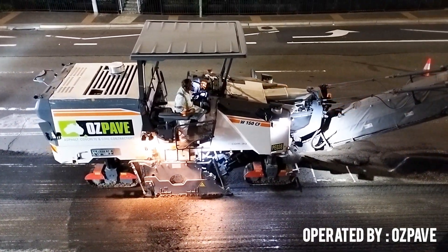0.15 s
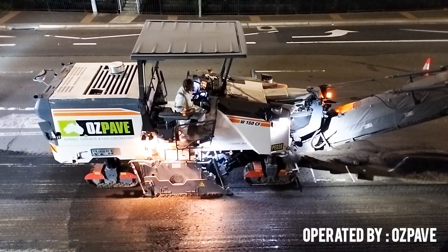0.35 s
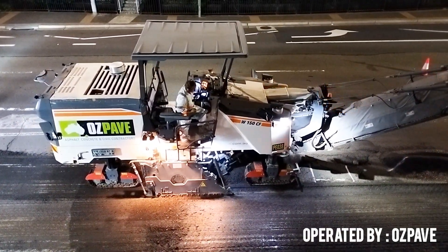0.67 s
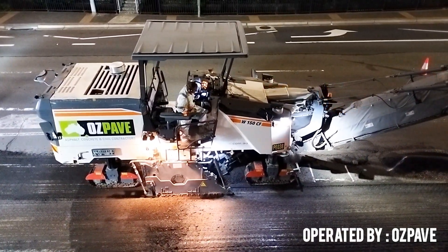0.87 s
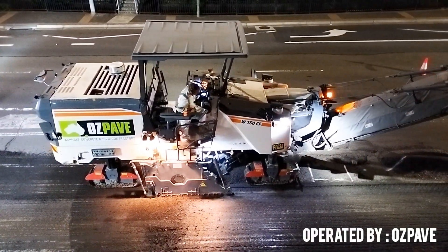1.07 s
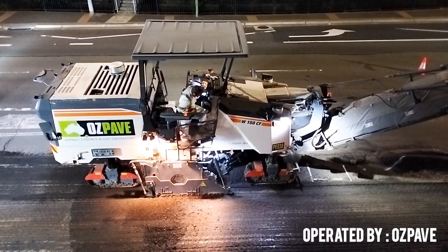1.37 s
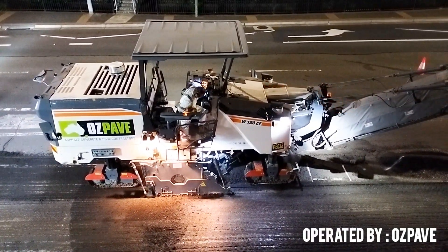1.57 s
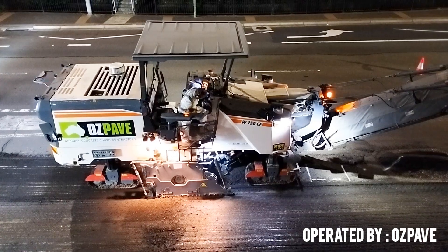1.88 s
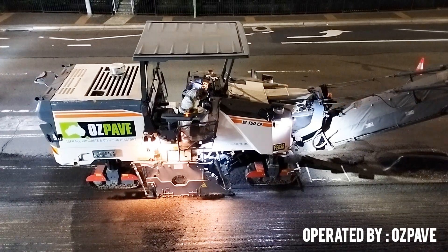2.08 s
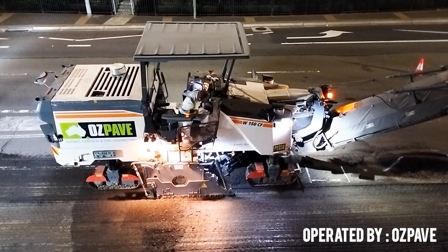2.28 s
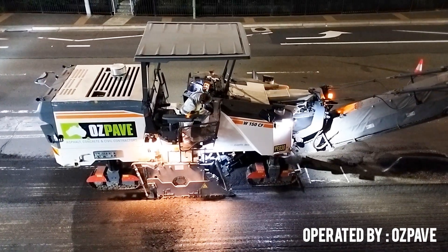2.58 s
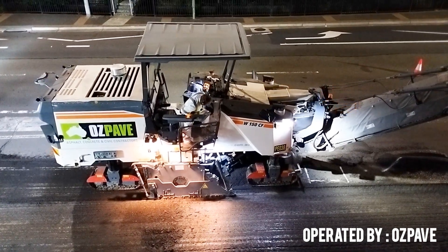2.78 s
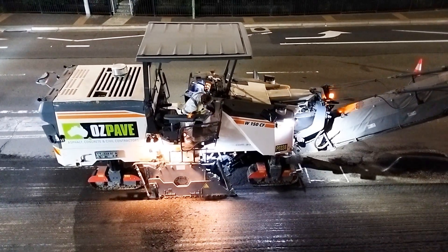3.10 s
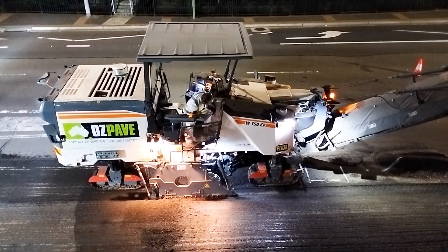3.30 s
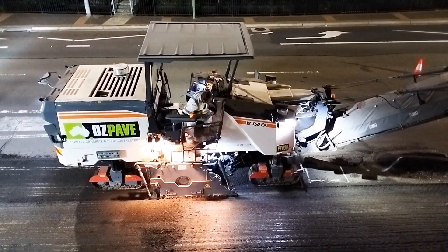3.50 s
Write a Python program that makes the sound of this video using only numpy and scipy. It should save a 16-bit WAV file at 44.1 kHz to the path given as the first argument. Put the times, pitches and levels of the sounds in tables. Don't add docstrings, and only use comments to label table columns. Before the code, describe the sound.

A road milling machine's diesel drones low, pulsing under load, with broadband drum roar and spray hiss; stones clatter on steel at once, then a few clacks. Outdoor night roadworks, heard from above on a phone.

```python
import sys
import numpy as np
from scipy import signal
from scipy.fft import rfft, irfft
from scipy.io import wavfile
from scipy.ndimage import uniform_filter1d

SR = 44100
rng = np.random.default_rng(int(sys.argv[2]) if len(sys.argv) > 2 else 0)


def magnitude_from_level(level_db):
    exponent = np.asarray(level_db, float) / 20
    return 10 ** exponent


def transcribe(signal):
    frames = np.atleast_2d(signal).T
    limited = np.clip(frames, -1, 1)
    pcm = np.round(limited * 32767).astype(np.int16)
    wavfile.write(sys.argv[1], SR, pcm)


N = 160965
T = np.arange(N) / SR
F = np.fft.rfftfreq(N, 1 / SR)

FIRING_HZ, DRUM_TURN_S = 103.05, 0.58
AIR_FROM_HZ = 7000

FIRING_ORDERS = (1 / 3, 1.5, 2, 2.5, 3, 4)
FIRING_ORDERS_DB = (-44, -29, -28, -27, -31, -33)
BELT_ORDERS = (1, 3, 7, 8, 9, 10, 13, 14, 16)
BELT_ORDERS_DB = (-49, -38, -30.5, -26, -33, -27.5, -47.5, -33, -38)
PUMP_ORDERS = (6, 7, 8)
PUMP_ORDERS_DB = (-55, -52, -45)
# frequency in Hz, density in dB per Hz.
ROAR_SPECTRUM = [(25, -44), (45, -25), (85, -10.5), (150, -9), (270, -4.5), (430, -8), (800, -17),
                 (1500, -22)]
# frequency in Hz, width in Hz, gain in dB.
HOUSING_MODES = [
    (150, 15, 4),
    (586, 210, -2.5),
    (810, 73, 3.5),
]
# frequency in Hz, density in dB per Hz.
SPRAY_SPECTRUM = [(1500, 1), (2300, -3.5), (2950, -5.5), (3500, -3.5), (4000, -4), (4400, -6.5),
                  (5500, -8.5), (7000, -12)]
# frequency in Hz, density in dB per Hz.
AIR_SPECTRUM = [(7000, 2.5), (7600, -6), (8100, -11.5), (9300, -19.5), (10000, -13), (11600, -6.5),
                (12800, -15.5), (14200, -21)]
# start
# in seconds, peak in dB, pitch in Hz, ring time in seconds.
STONES = [(.005, -12, 3430, 0.065), (.012, -3.5, 5140, 0.045), (.016, -2.5, 5130, .03),
          (.017, -15, 2130, .03), (0.022, -12, 3600, 0.041), (0.024, -4, 4330, 0.017),
          (0.03, -15, 2300, .04), (.048, -9, 1207, 0.17), (.056, -11, 1218, 0.23), (.066, -4, 4750, 0.02),
          (.067, -11, 3550, 0.029), (.070, -3, 2470, .018), (0.068, -9.5, 5660, 0.042),
          (0.07, -5, 1880, 0.015), (.073, -9.5, 3820, 0.032), (0.079, -12, 3480, .03),
          (0.084, -16, 5440, .04), (.106, -11.5, 1225, 0.21), (0.118, -9, 4960, 0.051),
          (.120, -6.5, 6430, .02), (.122, -15, 3390, 0.046), (0.141, -15, 2450, 0.051),
          (0.145, -15, 3320, 0.046), (0.225, -10, 4260, 0.014), (.226, -3, 1860, .022),
          (.228, -9, 2330, 0.021), (0.231, -13.5, 3420, 0.096), (.272, -13, 5030, 0.021),
          (.620, -13, 4300, 0.0089), (.623, -4, 2390, .015), (1.005, -20, 4000, 0.022),
          (1.013, -21, 3660, .02), (1.5635, 0, 2420, .007), (1.5636, -4, 3450, .007),
          (1.5668, -4, 2080, 0.01), (1.571, -17, 3980, 0.044), (1.580, -14, 2120, .03),
          (1.610, -11, 3400, 0.009), (1.614, -6, 3100, .01), (1.619, -16, 3600, .015),
          (1.624, -18, 2010, .02)]
# frequency in Hz, width in Hz, level in dB.
BED_MODES = [(1220, 40, 2), (2420, 60, -3), (3410, 60, -5), (3590, 50, -5), (3850, 60, -4), (5120, 87, -2),
             (5490, 60, -7), (6350, 77, -12)]
# start in seconds, peak in dB, pitch in Hz, ring time in seconds.
BOOMS = [
    (0.034, -1, 143, 0.22),
    (0.0067, -10, 100, 0.26),
    (0.1, -8, 85, 0.37),
]
# start in seconds, length in seconds, peak in dB, pitch in Hz, glide in Hz.
SQUEALS = [
    (1.19, .08, -24, 820, -80),
    (1.29, .07, -26, 820, 0),
    (1.46, .08, -37, 5750, 0),
    (1.95, .09, -34, 4680, 60),
    (3.17, .1, -36, 6700, 0),
]
# frequency in Hz, left over right in dB.
PORT_TILT = [(500, -.5), (1800, 2.5), (4500, -8), (8100, -1), (8900, 21), (9500, 15), (11000, -0.5),
             (14000, 7.5)]
# frequency in Hz, share of sound common to both from 0 to 1.
PORT_COHERENCE = [(200, 0.97), (400, 0.82), (750, 0.52), (1500, 0.23), (3500, 0.16), (5000, 0),
                  (7500, 0.28), (11500, 0.07)]


def level(x, db):
    return x * magnitude_from_level(db) / np.sqrt(np.mean(x ** 2))


def along(table):
    hz, value = np.array(table).T
    return np.interp(np.log(F + 1), np.log(hz), value)


def walk(rate):
    hold = int(SR / rate)
    steps = np.repeat(rng.standard_normal(N // hold + 1), hold)
    return 1.405 * uniform_filter1d(uniform_filter1d(steps, hold), hold)[:N]


def ring(push, hz, t60):
    pole = np.exp(2j * np.pi * hz / SR - np.log(1000) / (t60 * SR))
    return signal.lfilter([1], [1, -pole], push).imag


def right_delay():
    return np.exp(-2j * np.pi * F * 0.00054 * F / (F + 400))


def ports(rows):
    share = np.clip(along(PORT_COHERENCE), 0, 1)
    late = right_delay()
    common = rfft(rows[0]) * np.array([late ** 0, late])
    return np.sqrt(share) * common + np.sqrt(1 - share) * rfft(rows[1:])


def bands(spec, table, lo_hz, hi_hz, swell_db, near_db, flick_db):
    out, swell, near = 0, walk(5), walk(22)
    spec = spec * magnitude_from_level(along(table)) * (F > lo_hz) * (F < hi_hz)
    for hz in 22 * 2 ** np.arange(0, 9.6, 1 / 3):
        if lo_hz / 1.3 < hz < hi_hz * 1.3:
            near = 0.8 * near + 0.6 * walk(22)
            thirds = np.clip(3 * np.log2((F + 1) / hz), -1, 1)
            band = irfft(spec * np.cos(np.pi / 2 * thirds) ** 2, N)
            out = out + band * magnitude_from_level(swell_db * swell + near_db * near + flick_db * walk(20))
    return out


def lines(hz, orders, orders_db, wander, wobble_db, rate):
    out = 0
    for order, db in zip(orders, orders_db):
        size = np.sqrt(2) * magnitude_from_level(db + wobble_db * walk(2 * rate))
        turns = order * hz * T + rng.random() + wander * order * walk(rate)
        out = out + size * np.sin(2 * np.pi * turns)
    return out


def engines():
    labour = 1 + 0.26 * np.exp(2j * np.pi * (T - 1.99) / DRUM_TURN_S)
    load = magnitude_from_level(-13.5 - 14 * np.exp(-T / 0.32) + 0.5 * walk(20.26))
    firing = np.exp(2j * np.pi * FIRING_HZ * T + 0.15j * walk(4.7))
    main = np.sqrt(2) * load * (labour * firing).imag
    rough = lines(FIRING_HZ, FIRING_ORDERS, FIRING_ORDERS_DB, wander=0.09, wobble_db=4.0, rate=5)
    belt = lines(25.6, BELT_ORDERS, BELT_ORDERS_DB, wander=0.0064, wobble_db=2.75, rate=2.064)
    return main + rough + belt


def whines():
    rise = 0.32
    turn = ((T - 0.65) / DRUM_TURN_S) % 1
    sag = (1 - turn / (1 - rise)).clip(0) ** 1.6
    spool = np.maximum(sag, (turn - 1) / rise + 1)
    hz = 11550 + 550 * spool + 70 * walk(3) + 25 * walk(60)
    turbo = magnitude_from_level(-52 + 3.0 * walk(9) - 3.5 * spool) * np.sin(2 * np.pi * np.cumsum(hz) / SR)
    return turbo + lines(426.3, PUMP_ORDERS, PUMP_ORDERS_DB, wander=0.013, wobble_db=1.6, rate=1.6)


def roar():
    puff = 1 + 0.07 * np.sin(2 * np.pi * FIRING_HZ * T)
    noise = rng.standard_normal((3, N)) * puff
    housing = magnitude_from_level(sum(db * np.exp(-((F - hz) / width) ** 2) for hz, width, db in HOUSING_MODES))
    spec = ports(noise) * housing
    return level(bands(spec, ROAR_SPECTRUM, 18, 1500, swell_db=0.52, near_db=0.0, flick_db=0.25), -14.5)


def impacts(per_s, spread_db):
    hit = rng.random((3, N)) < per_s / SR
    size = magnitude_from_level(spread_db * rng.exponential(size=(3, N)).clip(0, 4))
    return hit * size * rng.standard_normal((3, N))


def squeaks():
    per_s, length_s = 700, 0.05
    out, n = np.zeros((3, N + SR)), int(length_s * SR)
    for k, (at, share, size) in enumerate(rng.random((int(per_s * N / SR), 3))):
        tone = np.sin(2 * np.pi * AIR_FROM_HZ * (1 + share) * T[:n])
        out[k % 3, int(at * N):][:n] += magnitude_from_level(12 * size) * np.hanning(n) * tone
    return out[:, :N]


def hiss():
    noise = rng.standard_normal((3, N)) + level(impacts(2500, 3.0), -7.0)
    notch = magnitude_from_level(-1.5 * np.exp(-((F - 2955) / 100) ** 2))
    spray = bands(ports(noise) * notch, SPRAY_SPECTRUM, 1500, AIR_FROM_HZ,
                  swell_db=0.15, near_db=0.8, flick_db=0.8)
    thin = noise + level(squeaks(), -3)
    air = bands(ports(thin), AIR_SPECTRUM, AIR_FROM_HZ, 14400, swell_db=0.3, near_db=0.8, flick_db=0.8)
    dust = magnitude_from_level(9 * np.exp(-T / 0.062))
    return level(spray, -26.5) + level(air, -41.5) * dust


def soften(x):
    return signal.sosfilt(signal.butter(6, 6300, fs=SR, output="sos"), x)


def stones():
    out, n = np.zeros(N), int(0.3 * SR)
    t = T[:n]
    chance = rng.standard_normal((len(STONES), 12))
    push = 1.0 * (np.arange(n) == 0)
    for (s, db, hz, t60), c in zip(STONES, chance):
        burst = rng.standard_normal(n) * np.exp(-t / 0.0015)
        crack = ring(ring(burst, hz, 0.0016), hz, 0.0016)
        crack = crack / np.abs(crack).max()
        own = ring(push, hz, t60) + 0.3 * ring(push, hz * (0.84 + 0.02 * c[0]), t60 / 2)
        own = own * np.minimum(t / 0.0008, 1)
        bed = sum(magnitude_from_level(g + 3 * q) * ring(push, f, 1.5 / w) for (f, w, g), q in zip(BED_MODES, c[3:]))
        out[int(s * SR):][:n] += magnitude_from_level(db) * (0.8 * own + magnitude_from_level(-8) * crack + magnitude_from_level(-20) * bed)
    for s, db, hz, t60 in BOOMS:
        out[int(s * SR):][:n] += magnitude_from_level(db) * ring(push, hz, t60) * np.minimum(t / 0.014, 1)
    return soften(out)


def patter():
    taps = impacts(1800, 1.8)
    rings = sum(magnitude_from_level(g) * ring(taps, f, 0.8 / w) for f, w, g in BED_MODES)
    rings = rings + magnitude_from_level(24) * ring(taps, 2660, 0.0012)
    rings = rings + magnitude_from_level(6) * ring(taps, 5200, 0.00072) + magnitude_from_level(11.5) * ring(taps, 880, 0.0048)
    fading = level(rings, -13) * 1000.0 ** (-T / 2.02)
    return irfft(ports(soften(fading)), N)


def site(x):
    t = T[:int(0.4 * SR)]
    tail = 1000.0 ** (-t / 0.17) * np.minimum(t / 0.0041, 1)
    tail = tail + magnitude_from_level(-18) * np.exp(-((t - 0.052) / 0.0049) ** 2) * 3
    reply = signal.lfilter([1, -1], [1, -0.93], rng.standard_normal((2, len(t)))) * tail
    reply = reply * magnitude_from_level(-5) / np.sqrt(np.sum(tail ** 2))
    return signal.fftconvolve(x[None], reply, axes=1)[:, :N]


def squeals():
    out = np.zeros(N)
    for s, length, db, hz, glide_hz in SQUEALS:
        turn = np.clip((T - s) / length, 0, 1)
        size = magnitude_from_level(db + 3 * walk(60)) * np.sin(np.pi * turn)
        pitch = hz + glide_hz * turn + 20 * walk(80)
        out += size * np.sin(2 * np.pi * np.cumsum(pitch) / SR)
    return out


def scene():
    clatter = stones()
    tones = rfft(engines() + whines() + squeals())
    tones = np.array([tones, tones * right_delay()])
    stone_lag_s = np.array([[0], [0.00052]])
    knocks = rfft(clatter) * np.exp(-2j * np.pi * F * stone_lag_s)
    return irfft(tones + knocks, N) + site(clatter) + patter() + roar() + hiss()


def top_cut(x):
    return signal.sosfilt(signal.butter(12, 14250, fs=SR, output="sos"), x)


def record(dry):
    tilt = along(PORT_TILT) / 2
    coloured = irfft(rfft(dry) * magnitude_from_level(np.array([tilt, -tilt])), N)
    ducked = coloured * magnitude_from_level(-3.5 * np.exp(-T / 0.45))
    mix = np.tanh(0.95 * ducked) / 0.95
    return top_cut(mix)


dry = scene()
out = record(dry)
transcribe(out)
```